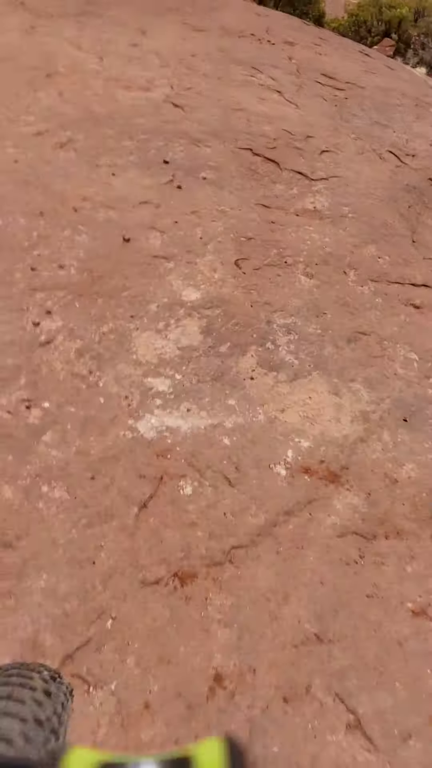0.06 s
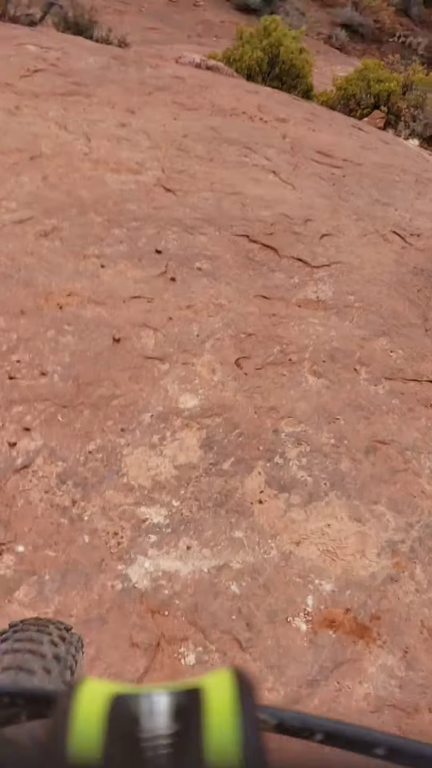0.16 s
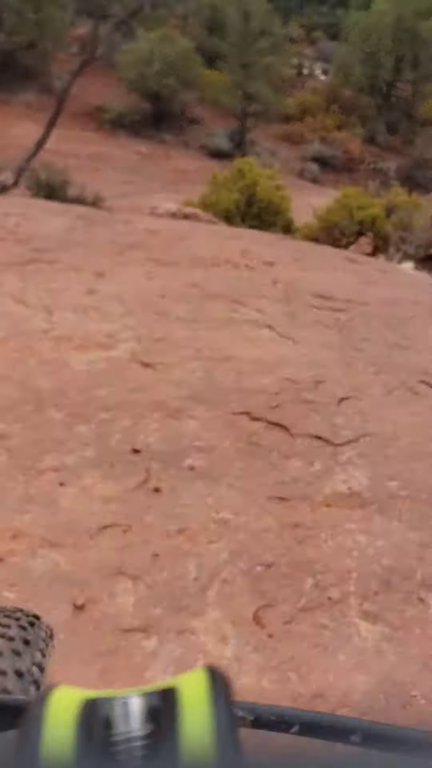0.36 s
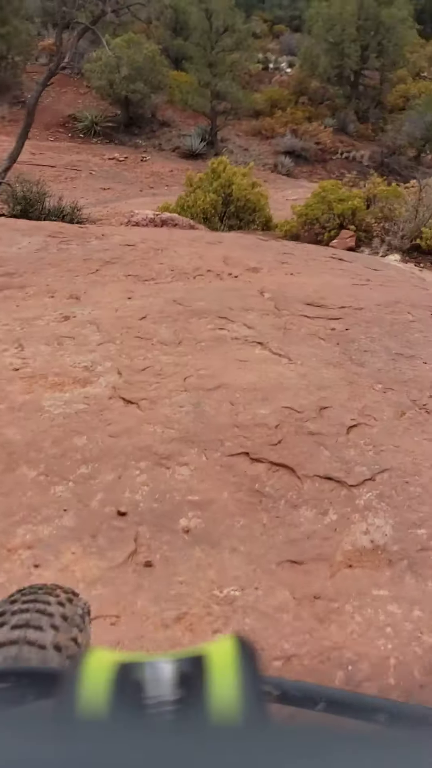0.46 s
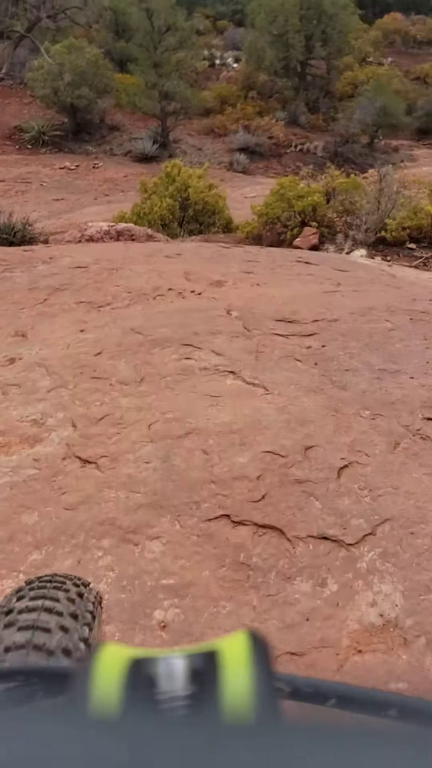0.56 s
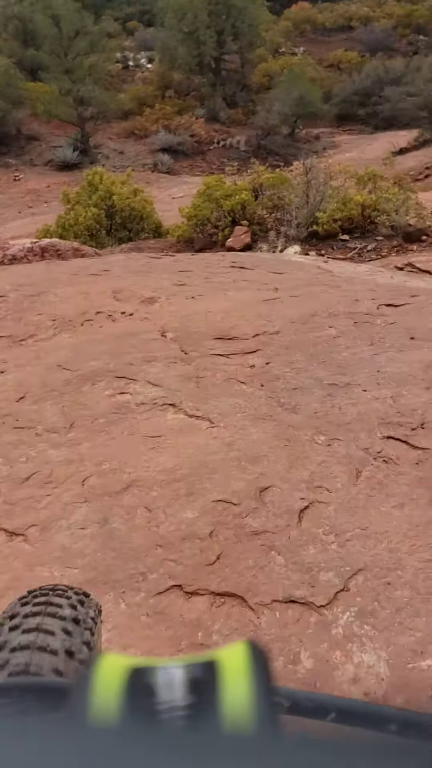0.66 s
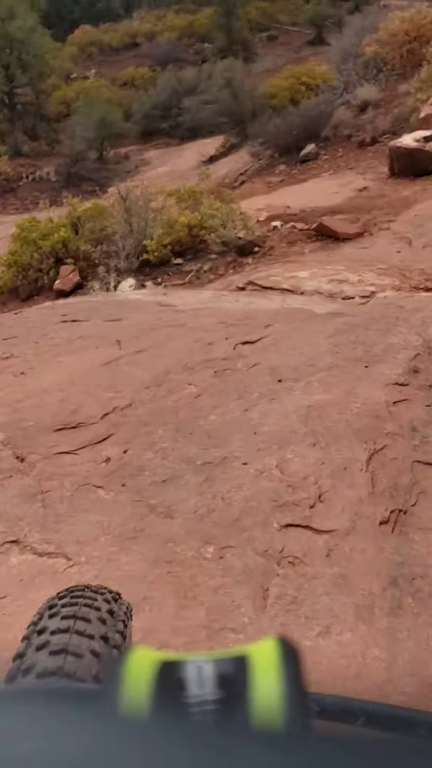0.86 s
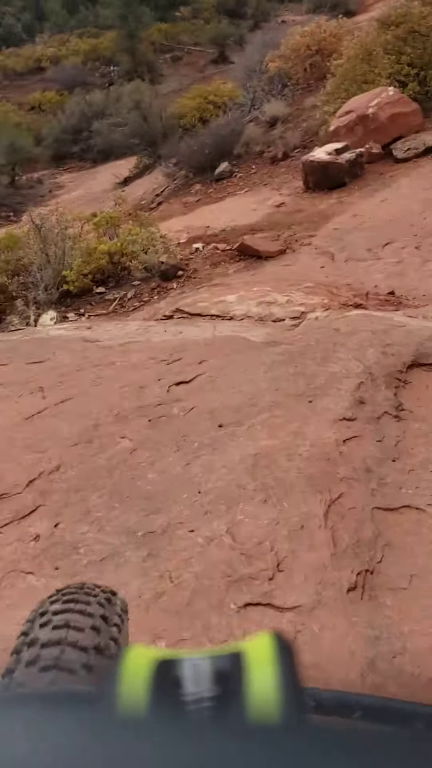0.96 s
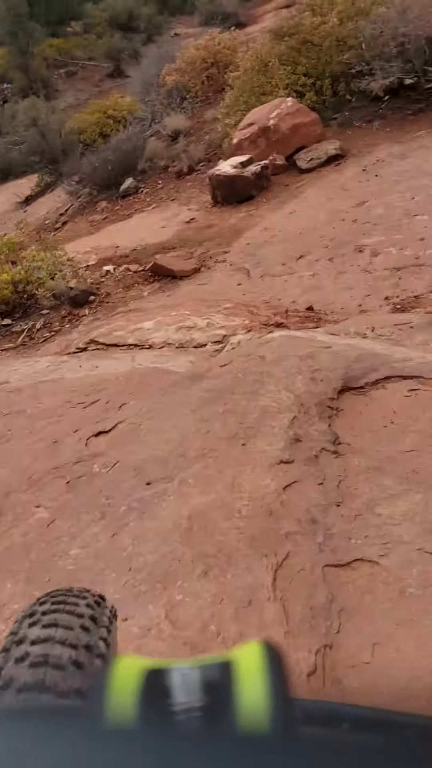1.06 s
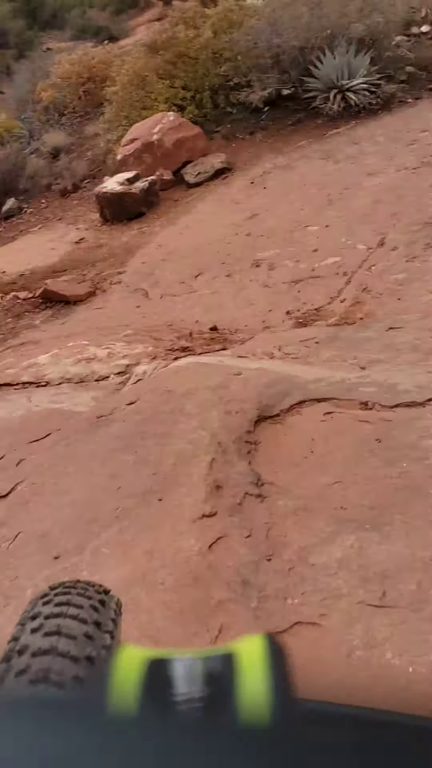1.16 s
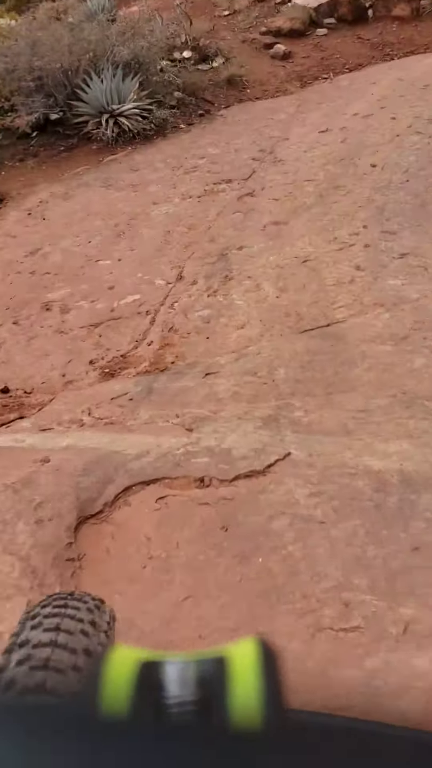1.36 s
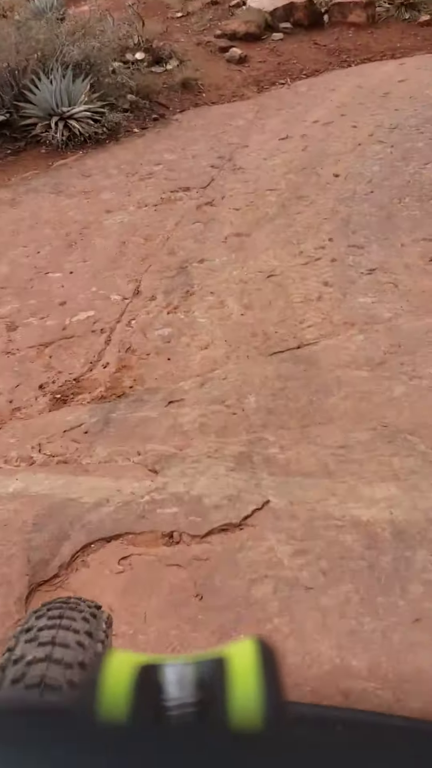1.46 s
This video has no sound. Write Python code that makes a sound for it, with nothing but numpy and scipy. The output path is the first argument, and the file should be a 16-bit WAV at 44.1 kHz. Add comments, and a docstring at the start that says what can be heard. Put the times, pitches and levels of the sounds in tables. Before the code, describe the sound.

Mountain bike tyres rumble over rock with a clattering bump and three short, high brake squeaks.

```python
"""Knobbly tyres drone and crunch grit under a rumble of wind: a mountain bike rolls down bare sandstone,
heard in stereo from the rider's chest. A bump makes it thud and clatter, as impacts excite the modes of
frame and chain. Stick-slip friction in a disc brake gives three short, very high squeaks,
and the bike rolls on more quietly."""
import sys
import numpy as np
from scipy import signal
from scipy.fft import rfft, irfft
from scipy.io import wavfile

SR = 44100
rng = np.random.default_rng(int(sys.argv[2]) if len(sys.argv) > 2 else 0)


def log_audio(samples):
    """Write samples as a 16-bit WAV file to the path given in sys.argv[1]."""
    # one column per channel
    frames = np.atleast_2d(samples).T
    # limit to full scale, then quantise
    limited = np.clip(frames, -1, 1)
    pcm = np.round(limited * 32767).astype(np.int16)
    wavfile.write(sys.argv[1], SR, pcm)


N = 66150
T = np.arange(N) / SR
HZ = np.maximum(np.fft.rfftfreq(N, 1 / SR), 1)
LEFT_ONLY = np.array([[1], [0]])


def from_db(db):
    """Amplitude ratio of a level in decibels."""
    return 10 ** (np.asarray(db) / 20)


def rms_one(x):
    """Normalisation to rms 1."""
    return x / np.sqrt(np.mean(x ** 2) + 1e-20)


def in_time(rows):
    """Linear interpolation of a time table's columns at every sample."""
    s, *columns = np.transpose(rows)
    return [np.interp(T, s, c) for c in columns]


def over_hz(rows):
    """Interpolation of a table's columns at every bin, along log frequency."""
    hz, *columns = np.transpose(rows)
    return [np.interp(np.log(HZ), np.log(hz), c) for c in columns]


def lifts(modes):
    """Resonance: Lorentzian peaks and dips add up to a gain in dB at every bin."""
    return sum(db / (1 + (2 * (HZ - hz) / width) ** 2) for hz, width, db in modes)


def colour(x, db):
    """Minimum-phase (causal) filter with the given gain per bin."""
    cepstrum = irfft(np.log(from_db(db)), N)
    cepstrum[1:N // 2] *= 2
    cepstrum[N // 2 + 1:] = 0
    return irfft(rfft(x) * np.exp(rfft(cepstrum)), N)


def band(x, hz, width):
    """Band-pass filtering by a steep-sided resonance, rms 1."""
    return rms_one(irfft(rfft(x) / (1 + (2 * (HZ - hz) / width) ** 4), N))


def struck(bursts, spectrum, modes):
    """Source and filter: bursts excite a body whose mean power gain is 1."""
    db = over_hz(spectrum)[0] + lifts(modes)
    return colour(bursts, db - 10 * np.log10(np.mean(from_db(db) ** 2)))


def dying(start, t60):
    """Damping: a sudden onset, then 60 dB of exponential decay in t60 seconds."""
    return (T >= start) * 1000. ** (-np.maximum(T - start, 0) / t60)


def drift(rate_hz):
    """Random fluctuation: low-passed noise, rms 1."""
    return rms_one(irfft(rfft(rng.standard_normal(N)) / (1 + (HZ / rate_hz) ** 2), N))


def swelling(depth_db=3, rate_hz=14):
    """Random amplitude modulation: a gain of rms 1."""
    return rms_one(from_db(depth_db * drift(rate_hz)))


def pan(db):
    """Constant-power panning: two gains for a left minus right level."""
    gains = from_db(np.reshape(db, (1, -1)) * np.array([[.5], [-.5]]))
    return gains / np.sqrt(np.mean(gains ** 2, axis=0))


def white():
    """Incoherent white noise at the two microphones."""
    return rng.standard_normal((2, N))


def from_below(lag_s=.0005):
    """Partial coherence: the microphones share part of the bike's noise, the left one lagging."""
    # stereo image: (frequency [Hz], coherence [0-1], left minus right [dB])
    image = [(154, 0, -0.5), (280, 0.16, 3), (410, 0.03, -8.5), (810, 0.5, 2), (925, 0.84, -4.5),
             (1200, 1, 0), (2160, 0.56, -0.5), (3500, 0.85, 0.5), (5490, 0, 1.5)]
    coherence, side_db = over_hz(image)
    shared = rfft(rng.standard_normal(N)) * np.exp(-2j * np.pi * HZ * lag_s * LEFT_ONLY)
    spectrum = np.sqrt(coherence) * shared + np.sqrt(1 - coherence) * rfft(white())
    return irfft(spectrum * pan(side_db), N)


def wind():
    """Turbulence makes a separate low rumble at each microphone."""
    # gusts: (time [s], level [dB], left minus right [dB])
    gusts = [(0, -27, 6), (.08, -42, -1), (.2, -32.5, 18), (.3, -29, 45), (.39, -29, 7), (.46, -47, 9),
             (.65, -50, 4), (.8, -47, 7), (.9, -45.5, 3), (1.0, -53, 18.5), (1.1, -47.5, 3.5),
             (1.22, -49.5, 6), (1.38, -43.5, 15), (1.5, -45.5, 40)]
    # rumble: (frequency [Hz], relative level [dB])
    spectrum = [(10, -38), (25, -7), (42, 2), (80, 3), (120, -1.5), (180, -15.5), (400, -38.5),
                (1500, -51.5)]
    db, side_db = in_time(gusts)
    return from_db(db) * pan(side_db) * rms_one(colour(white(), over_hz(spectrum)[0]))


def spray(centre_s=1.0, spread_s=.035, level_db=-56):
    """Fine sand off the tyre hisses briefly: high band noise under a Gaussian envelope."""
    swell = np.exp(-.5 * ((T - centre_s) / spread_s) ** 2)
    return from_db(level_db) * swell * band(white(), hz=13500, width=6000)


def whine():
    """Narrow-band noise is heard as a thin whine while the bike rolls."""
    # envelope: (time [s], level [dB])
    levels = [(0, -72), (.2, -60), (.6, -76), (.8, -64), (1.1, -64), (1.35, -73), (1.5, -69)]
    return from_db(in_time(levels)[0]) * swelling() * band(from_below(), hz=3725, width=140)


def hollow_ring():
    """A narrow resonance of the rolling bike swells and wavers by frequency modulation."""
    # course of the resonance: (time [s], level [dB], frequency [Hz])
    course = [(0, -52, 1510), (.15, -34.5, 1500), (.27, -53, 1500), (.36, -50, 1540), (.48, -42.5, 1570),
              (.55, -70, 1550), (.67, -52, 1510), (.7, -46, 1520), (.78, -52, 1540), (.89, -44.5, 1560),
              (.95, -52, 1490), (1.09, -51.5, 1560), (1.15, -49, 1480), (1.25, -53, 1490),
              (1.3, -45.5, 1540), (1.39, -59, 1490), (1.48, -45, 1520), (1.5, -60, 1500)]
    db, hz = in_time(course)
    waver = np.exp(2j * np.pi * np.cumsum(hz - hz.mean()) / SR)
    ring = signal.hilbert(band(from_below(), hz.mean(), width=140)) * waver
    return from_db(db) * ring.real


def casing():
    """Forced vibration: the ground makes the air-filled tyre hum at two resonances."""
    # envelopes: (time [s], level of the lower tone [dB], level of the upper tone [dB])
    levels = [(0, -41, -48), (0.099, -45.5, -28), (.2, -44, -66), (.36, -45, -61), (.45, -52, -49),
              (.53, -47, -50), (.61, -44, -49), (.68, -57, -52), (.84, -58.5, -62), (.93, -52, -40.5),
              (1.05, -59, -54.5), (1.25, -59, -48.5), (1.5, -58, -59.5)]
    # resonances: (frequency [Hz], bandwidth [Hz])
    tones = [(245, 30.4), (522, 80)]
    return sum(from_db(db) * swelling() * band(from_below(), hz, width)
               for db, (hz, width) in zip(in_time(levels), tones))


def scrub():
    """Sliding friction: rubber rasps on rock in a few bands, harder on the steep part."""
    # envelope: (time [s], level [dB])
    levels = [(0, -38.5), (.06, -52.5), (.16, -37.5), (.27, -40.5), (.32, -48.5), (.38, -51), (.55, -60.5),
              (.9, -55), (1.5, -78)]
    # resonances: (frequency [Hz], bandwidth [Hz], relative level [dB])
    modes = [(2057, 810, 6.5), (2280, 99, -24), (4627, 250, 1)]
    gain = sum(from_db(db) / (1 + (2 * (HZ - hz) / width) ** 2) for hz, width, db in modes)
    return from_db(in_time(levels)[0]) * rms_one(irfft(rfft(from_below()) * gain, N))


def uneven_ground(x, depth_db=2.2, rate_hz=22):
    """Amplitude modulation by uneven ground: each half octave swells and fades on its own."""
    half_octaves = np.clip(2 * np.log2(HZ / 200), 0, 8)
    spectrum = rfft(x)
    bands = [irfft(spectrum * np.maximum(1 - abs(half_octaves - k), 0), N) for k in range(9)]
    return sum(part * from_db(depth_db * drift(rate_hz)) for part in bands)


def tyres(grains_per_s=460, grit_db=-9.5, grain_spread_db=2):
    """Rolling noise: knobs on rock drive resonances of tyre and frame; sand hisses and crackles."""
    # envelopes: (time [s], drone level [dB], hiss level [dB])
    levels = [(0, -29.5, -49.5), (.11, -32.5, -46.5), (.21, -31.5, -44.5), (.27, -33.5, -43),
              (.33, -39.5, -45.5), (.39, -40.5, -54), (.47, -38, -52.5), (.57, -39.5, -54.5),
              (.65, -43, -57.5), (.78, -41.5, -58), (.86, -45, -57), (.91, -43.5, -56), (1.0, -42, -51),
              (1.13, -45, -58), (1.22, -48, -62), (1.31, -45.5, -61), (1.42, -45, -61), (1.5, -44, -59.5)]
    # drone and hiss: (frequency [Hz], relative level [dB])
    drone_spectrum = [(60, -23), (170, -2), (310, -5.5), (450, 0.5), (780, -2.5), (1030, -5), (1400, -5.5),
                      (2100, -10), (2900, -17.5), (4500, -22), (9000, -54)]
    hiss_spectrum = [(1500, 4), (3000, -10.5), (4000, 0.5), (6800, 9), (8200, -2.5), (11000, 4), (15500, 3)]
    # tyre and frame: (frequency [Hz], bandwidth [Hz], gain [dB])
    modes = [(387, 47, 5), (533, 78, 2.5), (667, 220, 5), (1215, 160, 9), (1440, 110, 7.5), (1663, 94, 7.5)]
    drone_db, hiss_db = in_time(levels)
    body_db = over_hz(drone_spectrum)[0] + lifts(modes)
    contact = from_db(1.5 * drift(rate_hz=78))  # roughens drone and hiss together
    drone = rms_one(colour(uneven_ground(from_below()) * contact, body_db))
    grain_sizes = from_db(grain_spread_db * np.minimum(rng.exponential(1, N), 4))
    grit = rms_one((rng.random(N) < grains_per_s / SR) * grain_sizes * white())
    sand = white() * contact + from_db(grit_db) * grit
    hiss = rms_one(colour(sand, over_hz(hiss_spectrum)[0]))
    return from_db(drone_db) * drone + from_db(hiss_db) * hiss


def thuds(spread_cycles=.28):
    """Heavily damped motion: each bump gives the bike one low swing with a small rebound."""
    # bumps: (time of peak [s], peak level [dB], frequency [Hz], left minus right [dB])
    bumps = [(.012, -31, 68, -20), (0.111, -24, 70.4, 5), (0.2372, -12, 79, 5.5), (0.312, -15, 47.4, 25),
             (0.357, -17, 97, 6), (0.594, -28.5, 82.5, 3), (.667, -38.5, 70, 8), (0.741, -32.5, 81, 4),
             (0.815, -34, 58, -3), (0.898, -32, 60.5, 5), (0.919, -29.5, 60.4, 2), (1.01, -39.5, 63, 5)]
    out = 0
    for s, db, hz, side_db in bumps:
        cycles = (T - s) * hz
        swing = np.exp(-.5 * (cycles / spread_cycles) ** 2) * np.cos(2 * np.pi * cycles)
        out = out - from_db(db) * pan(side_db) * swing
    return out


def ticks(gain_db=-5.5):
    """Light impacts of chain, cables and pebbles excite the high modes of small metal parts."""
    # impacts: (time [s], relative level [dB], left minus right [dB], t60 [s])
    impacts = [(0.014, -19, -4, 0.024), (0.223, -12.5, 1.5, 0.019), (0.246, -33, -8, .02),
               (0.29, -18.5, 0, 0.049), (0.2942, -23, 15, .028), (0.315, -15.5, 1, 0.019),
               (0.361, -34, -9.5, 0.016), (0.3825, -26.5, 2, .014), (0.647, -36.5, 0, 0.025),
               (.924, -41, 2, 0.017), (0.926, -29, -1, .012), (0.982, -42, 3, .02), (0.991, -38, 4, 0.016),
               (1.0725, -32, -9, 0.017), (1.083, -32, 6, 0.013), (1.229, -45, -5, .015),
               (1.2912, -44, -8, .02), (1.347, -45.5, -1.5, .02), (1.399, -46, 0.5, .02),
               (1.43, -36, -13, 0.036), (1.4435, -37, -1, 0.022), (1.457, -40, 4, .012)]
    # broad response: (frequency [Hz], relative level [dB])
    spectrum = [(800, -59), (3000, 0), (4800, -6), (6500, 6), (9000, -1), (12000, 7), (16000, 0.5)]
    # its peaks and dip: (frequency [Hz], bandwidth [Hz], gain [dB])
    modes = [(4650, 730, 11), (5600, 330, 2), (8930, 1900, -4), (8970, 550, 8)]
    envelope = sum(from_db(db) * pan(side_db) * dying(s, t60) for s, db, side_db, t60 in impacts)
    return from_db(gain_db) * struck(envelope * white(), spectrum, modes)


def pings():
    """Free vibration: after the bump, metal parts ring briefly, each in its own band."""
    # parts: (time [s], level [dB], frequency [Hz], bandwidth [Hz], t60 [s])
    parts = [(0.317, -19.5, 9000, 2120, 0.034), (0.317, -28, 5160, 1000, 0.021),
             (0.334, -33.5, 4250, 600, 0.06), (0.334, -36, 9230, 2590, 0.044)]
    return sum(from_db(db) * dying(s, t60) * band(white(), hz, width) for s, db, hz, width, t60 in parts)


def knocks(gain_db=-5.5, side_db=-3, crack_height=1.515, crack_s=.0001):
    """Impact excitation: a crack and a short rattle ring the frame; softer contacts are duller."""
    # frame and chain: (time [s], relative level [dB], cutoff [Hz], t60 [s], left lag [s])
    impacts = [(0.221, -20, 2200, 0.013, 0.011), (0.237, -9, 230, 0.051, .0005),
               (0.2863, -12.5, 6000, 0.042, -0.0049), (0.2892, -19.5, 12000, 0.036, .0005),
               (0.292, -15, 2410, 0.014, 0.0084), (0.295, -18, 12500, 0.018, 0.0086),
               (0.3, -7.5, 6100, 0.0047, .00066), (0.3015, -12.5, 6150, 0.029, .00057),
               (0.3117, -14.5, 1700, .014, -.0004), (0.32, -22.5, 1200, 0.037, .0005),
               (0.3341, -14.5, 2400, 0.017, .00068), (0.3383, -25, 1900, .025, .0005),
               (0.3531, -16, 950, 0.011, 0.004), (0.358, -9.5, 295, 0.03, -0.0095),
               (.368, -27, 2200, 0.018, 0), (0.917, -36.5, 5100, .02, .0005),
               (1.082, -36.5, 5030, 0.022, .0005), (1.164, -34.5, 3000, .02, .0005)]
    # broad response: (frequency [Hz], relative level [dB])
    spectrum = [(80, 3.5), (250, 6.5), (600, 7), (1100, 7.5), (1500, -3.5), (2100, 1.5), (3000, -2.5),
                (5000, -12.5), (10000, 3), (16000, -26)]
    # frame modes: (frequency [Hz], bandwidth [Hz], gain [dB])
    modes = [(415, 120, 4.5), (912, 35, 5.5), (1860, 430, 10.5), (2246, 15, 5), (4180, 420, 10.5),
             (5700, 220, 8.5)]
    force = 0
    for s, db, cutoff_hz, t60, lag_s in impacts:
        crack = crack_height * np.exp(-((T - s - lag_s * LEFT_ONLY) / crack_s) ** 2)
        rattle = from_below(lag_s) * dying(s, t60)
        softness = signal.butter(2, cutoff_hz, fs=SR)
        force = force + from_db(db) * signal.lfilter(*softness, crack + rattle + 1e-18)
    return from_db(gain_db) * pan(side_db) * struck(force, spectrum, modes)


def brake():
    """Stick-slip friction sets one mode of the disc singing; it flutters, dies and leaves a faint ring."""
    # squeaks: (time of full grip [s], hold [s], level [dB], frequency [Hz],
    #           left minus right [dB], roughness [noise-to-tone amplitude ratio])
    squeaks = [(0.321, 0.0065, -6.5, 13760, -3, 1.1), (0.433, 0.015, -11, 13710, -4, 0.9),
               (0.565, 0.017, -10.5, 13610, -7, 0.42)]
    rise_db_per_s, fall_db_per_s = 3295, 1299
    sharp_hz, recovery = 259.2, .15  # pitch rise at light grip; share regained on release
    wobble_hz, left_lag_rad, saturation = 28.2, 2.4, .65
    out = 0
    for s, hold, db, hz, side_db, roughness in squeaks:
        grip = from_db(-rise_db_per_s * np.maximum(s - T, 0) - fall_db_per_s * np.maximum(T - s - hold, 0))
        glide = sharp_hz * (1 - grip) * np.where(T < s, 1, recovery)
        pitch = hz + glide + wobble_hz * drift(rate_hz=129.8)
        phase = 2 * np.pi * np.cumsum(pitch) / SR - left_lag_rad * LEFT_ONLY
        slip = signal.hilbert(band(white(), hz, width=340))
        swing = np.sqrt(2) * np.exp(1j * phase) + roughness * slip
        voice = grip * swing.real / np.sqrt(1 + saturation * abs(swing) ** 2)  # friction limits the swing
        voice *= np.sqrt(np.sum(grip ** 2) / np.sum(voice ** 2, axis=1, keepdims=True))
        ring = from_db(-31) * dying(s, t60=.32) * band(white(), hz + sharp_hz / 2, width=380)
        rasp = from_db(-39) * grip * band(white(), hz, width=1840)
        out = out + from_db(db) * (pan(side_db) * (voice + rasp) + ring)
    return out


def scene():
    """Superposition of all sources at the two microphones."""
    rolling = tyres() + hollow_ring() + whine() + casing() + scrub() + wind()
    return rolling + thuds() + knocks() + ticks() + pings() + brake() + spray()


def record(dry):
    """Band limiting: a steep elliptic low-pass cuts the treble above 16 kHz."""
    return signal.sosfilt(signal.ellip(12, .1, 90, 16000, fs=SR, output="sos"), dry)


dry = scene()
out = record(dry)
log_audio(out)
```